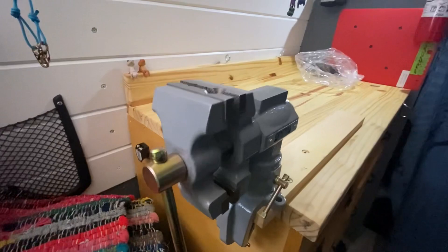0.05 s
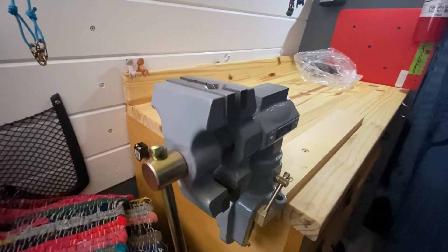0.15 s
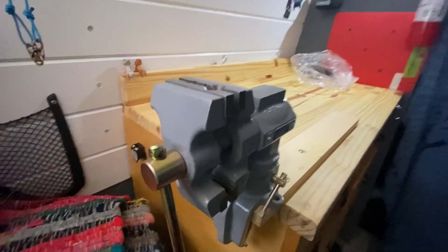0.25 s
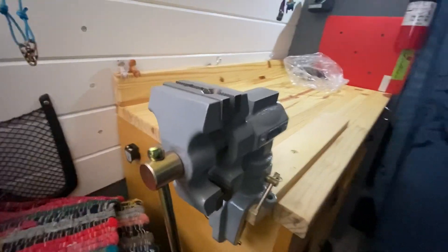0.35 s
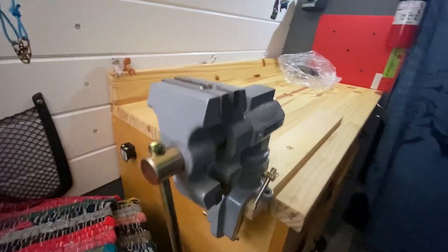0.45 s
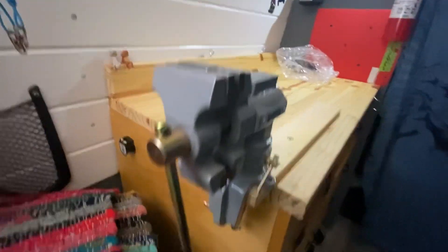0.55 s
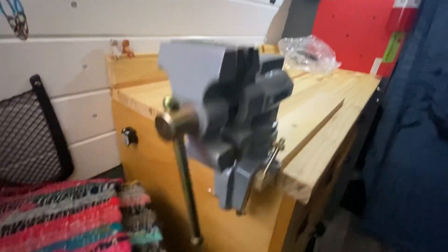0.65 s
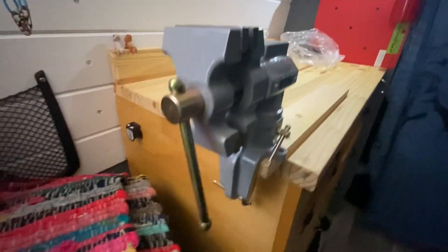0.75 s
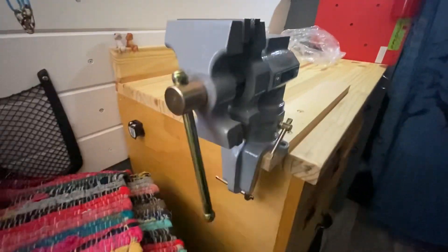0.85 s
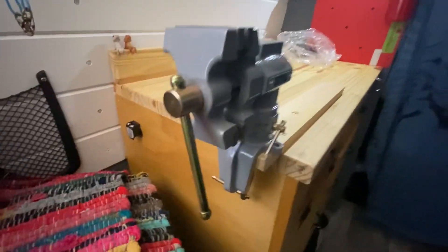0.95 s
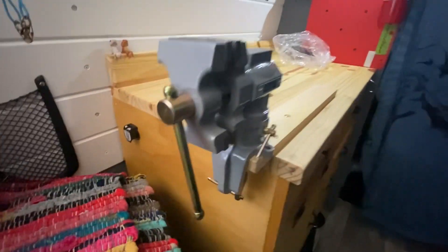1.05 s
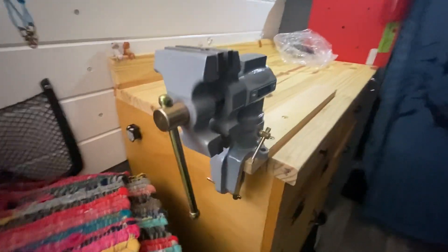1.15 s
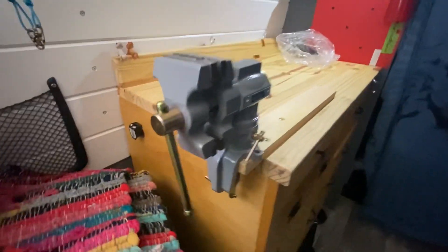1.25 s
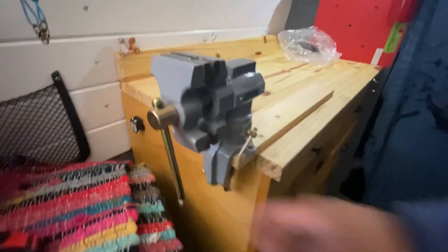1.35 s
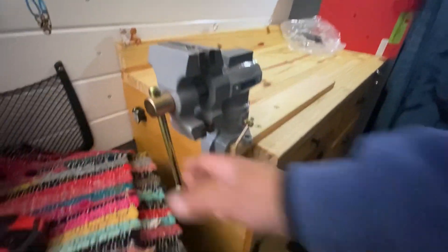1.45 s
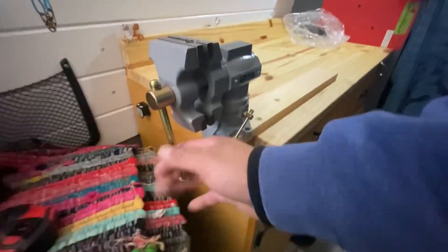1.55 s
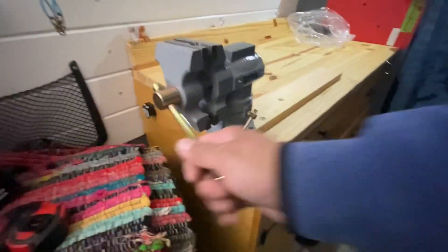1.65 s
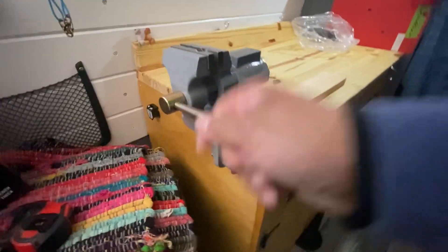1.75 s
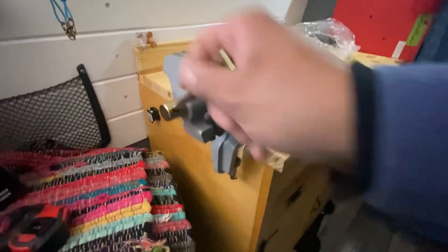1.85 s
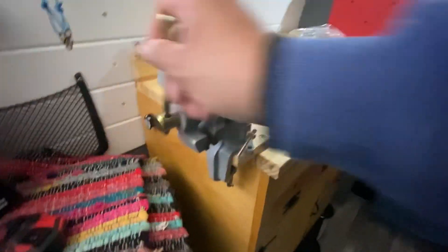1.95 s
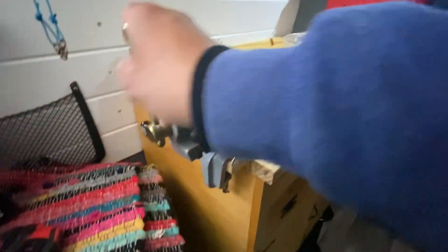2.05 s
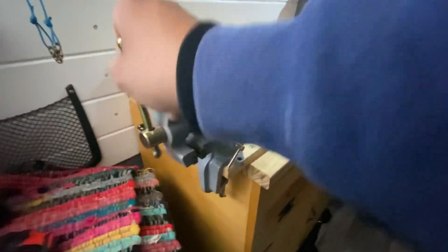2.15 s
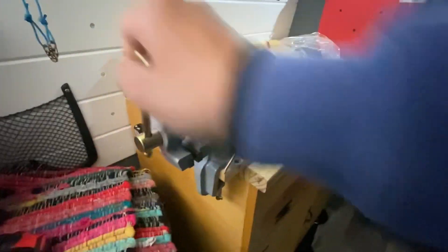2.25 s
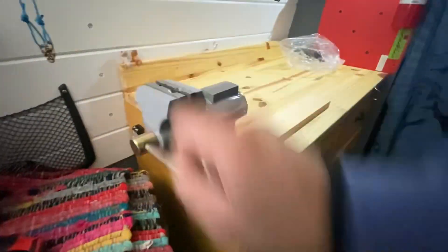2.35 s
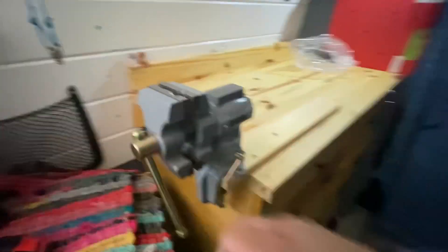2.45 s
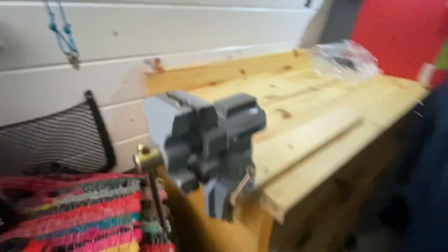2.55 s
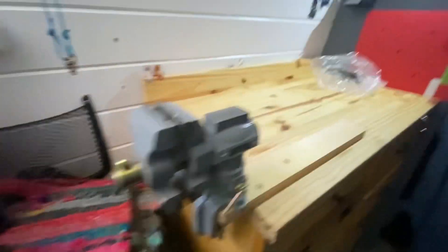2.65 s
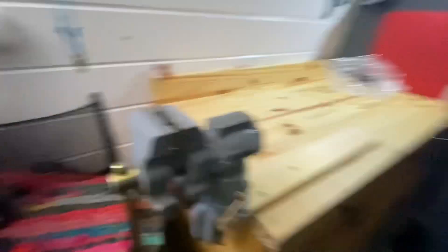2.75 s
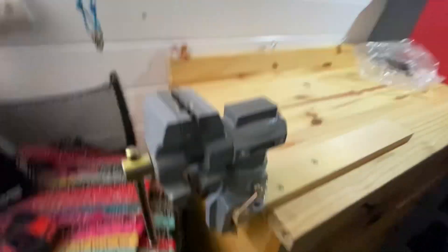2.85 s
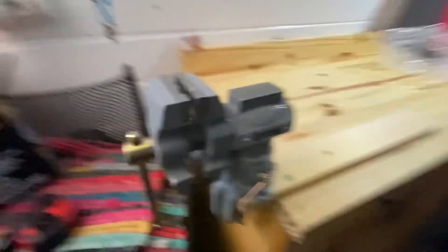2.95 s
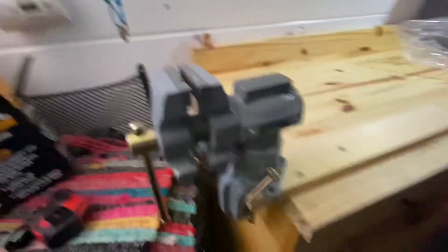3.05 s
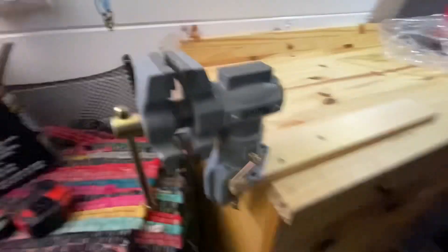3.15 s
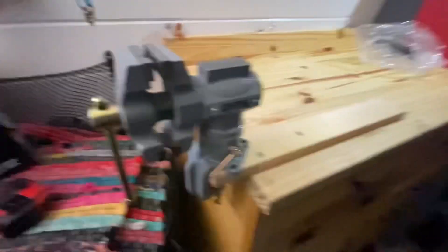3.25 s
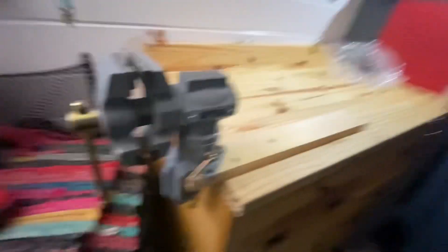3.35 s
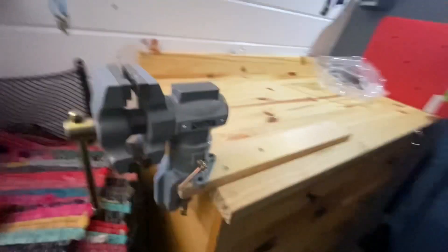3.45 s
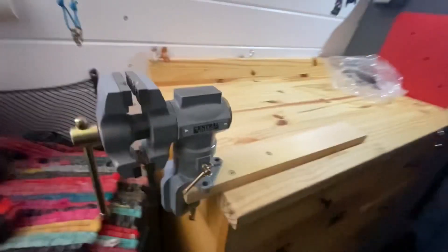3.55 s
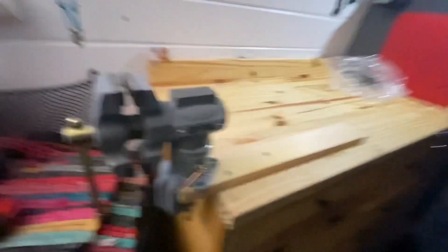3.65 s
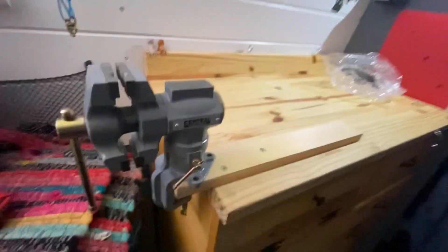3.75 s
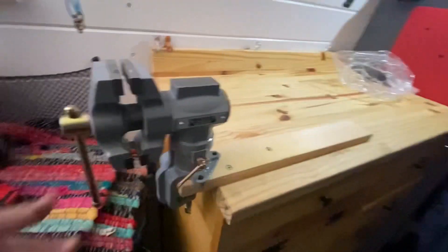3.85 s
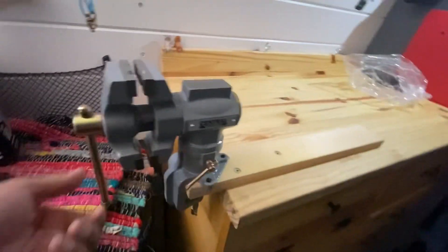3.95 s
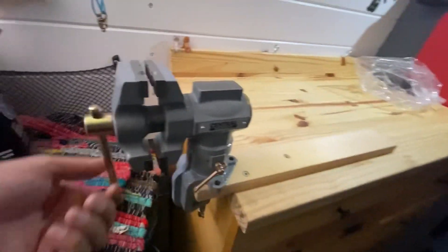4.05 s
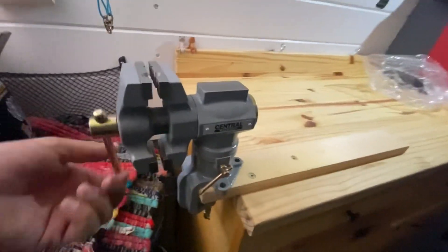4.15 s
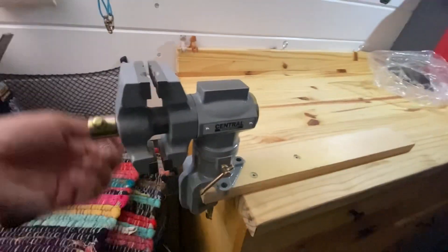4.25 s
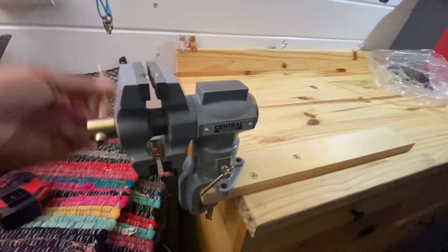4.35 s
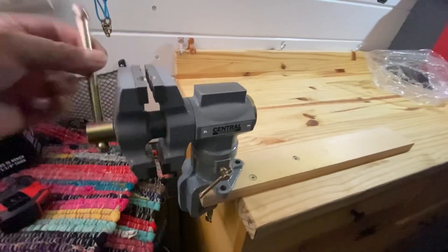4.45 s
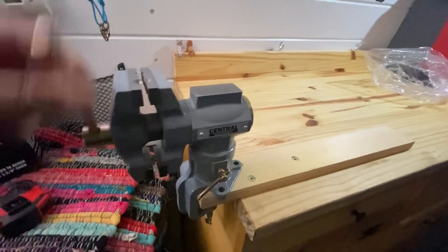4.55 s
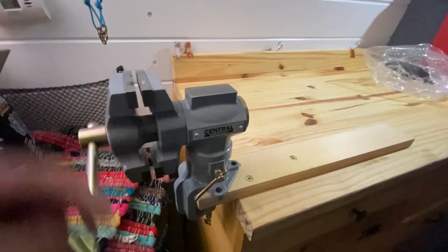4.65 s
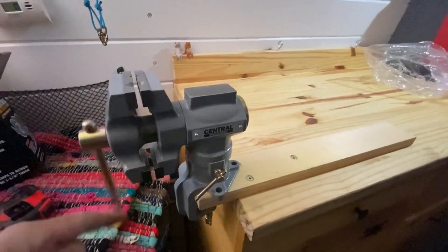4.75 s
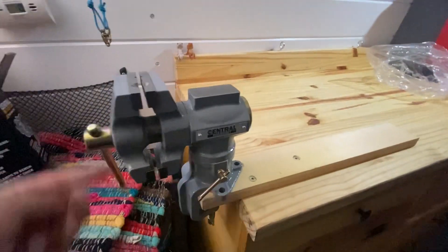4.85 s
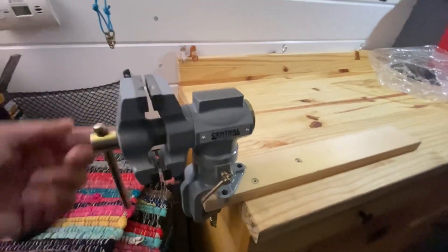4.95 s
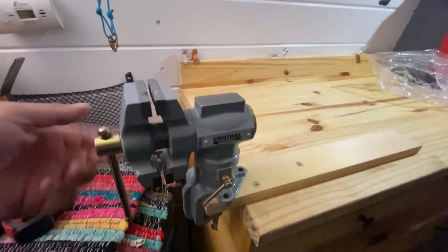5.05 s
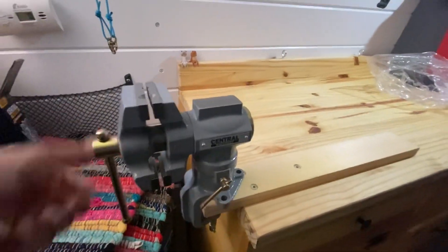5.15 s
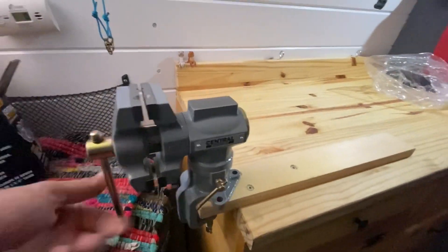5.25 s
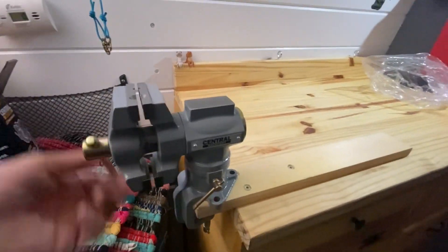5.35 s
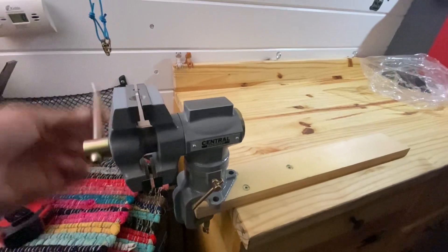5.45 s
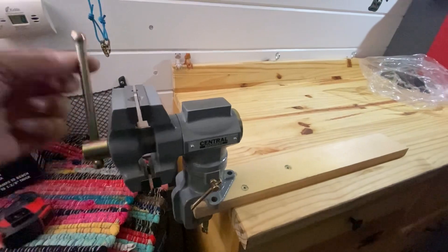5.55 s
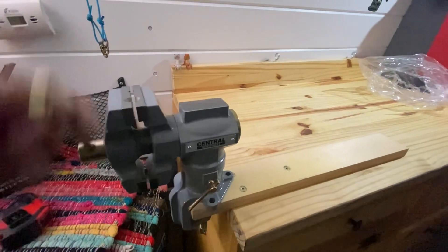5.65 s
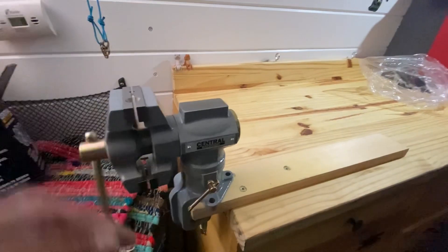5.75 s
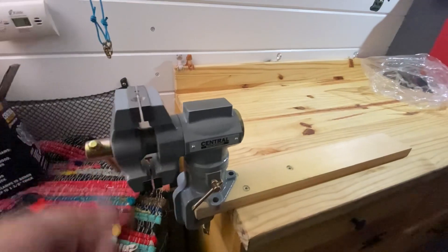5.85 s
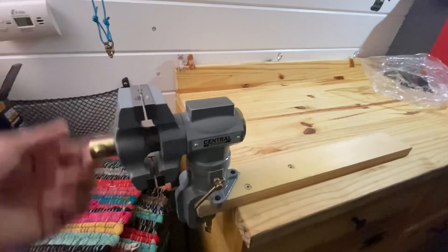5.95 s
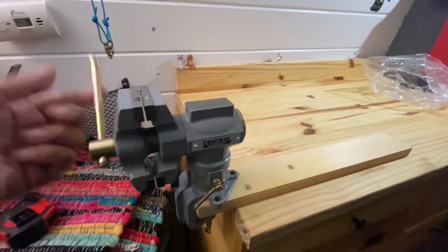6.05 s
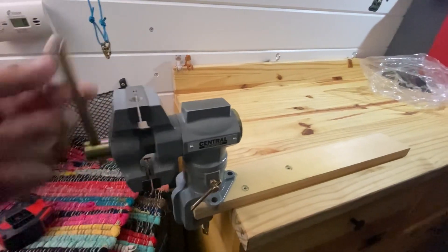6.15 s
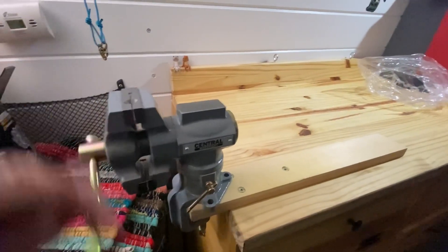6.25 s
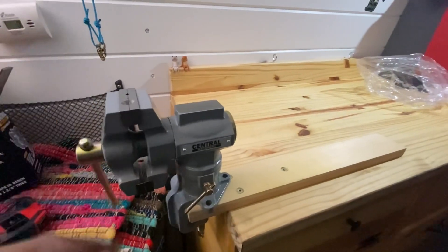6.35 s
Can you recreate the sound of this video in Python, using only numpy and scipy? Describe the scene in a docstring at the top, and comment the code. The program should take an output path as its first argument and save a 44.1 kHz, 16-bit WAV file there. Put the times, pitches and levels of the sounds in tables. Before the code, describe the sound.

A hand flips the handle of a bench vise in a small, dry cabin. Short metallic clacks and ringing clinks come in loose clusters, each with a rattle and dull wooden thud, and the turning screw gives brief rough groans. The loudest strike comes about a third of the way through. Low rumble wavers outside, strongest early, while clothing rustles near the stereo microphone; metal sits slightly left.

```python
"""In a small cabin, a hand swings and slides the steel handle of a bench vise clamped to a wooden bench.
The rod knocks in its hole: decaying sines ring, filtered noise cracks and rattles.
The bench thuds and groans as the screw turns: resonators are driven by the blows and by rough noise.
Ticks and faint reflections fill the cabin, cloth rustles near the microphone and a low rumble
swells and fades outside: all but the ticks are shaped noise."""
import sys
import numpy as np
from scipy import signal
from scipy.fft import rfft, irfft
from scipy.io import wavfile

SR = 44100
rng = np.random.default_rng(int(sys.argv[2]) if len(sys.argv) > 2 else 0)


def to_wav(s):
    """Save 16-bit WAV."""
    ch = np.atleast_2d(s).T  # columns
    pcm = np.round(np.clip(ch, -1, 1) * 32767)  # PCM
    wavfile.write(sys.argv[1], SR, pcm.astype(np.int16))


N = 281835


def from_db(db):
    """Decibel law: 20 dB is a factor of ten in amplitude."""
    return 10 ** (np.asarray(db) / 20)


def rms_one(x):
    """Normalisation to unit effective value."""
    return x / np.sqrt(np.mean(x ** 2) + 1e-20)


def in_time(rows):
    """Linear interpolation of each column over the seconds in the first."""
    seconds, *columns = np.transpose(rows)
    return [np.interp(np.arange(N) / SR, seconds, column) for column in columns]


def at_hz(points, hz):
    """Interpolation on a logarithmic frequency axis."""
    points_hz, values = np.array(points).T
    return np.interp(np.log(hz), np.log(points_hz), values)


def drift(rate_hz):
    """Low-pass random process: noise through two equal poles wanders slowly with spread 1."""
    pole = np.exp(-80 * np.pi * rate_hz / SR)  # one step every 40 samples
    noise = rng.standard_normal(N // 40 + 2002)
    slow = signal.lfilter([1], [1, -2 * pole, pole * pole], noise)[2000:]
    return np.interp(np.arange(N) / 40, np.arange(len(slow)), rms_one(slow))


def swells(s, db, rise_ms, fall_ms, order=1):
    """Superposed envelopes, as a level in dB; order 1 gives pointed peaks, 2 round ones."""
    t = np.arange(0, N, 32)[:, None] / SR - s
    away = np.where(t < 0, -1000 * t / rise_ms, 1000 * t / fall_ms)
    gain = from_db(db - 20 * away ** order).sum(axis=1)
    return np.interp(np.arange(N) / 32, np.arange(len(gain)), 20 * np.log10(gain + 1e-7))


def ring(force, hz, t60):
    """Damped resonator: a unit click sets a sine of initial height 1 ringing."""
    radius, angle = from_db(-60 / (t60 * SR)), 2 * np.pi * hz / SR
    feedback = [1, -2 * radius * np.cos(angle), radius * radius]
    return signal.lfilter([0, np.sin(angle)], feedback, force + 1e-18)


def band(x, low_hz, high_hz):
    """Band-pass filtering."""
    edges = [low_hz, min(high_hz, .45 * SR)]
    return signal.sosfilt(signal.butter(2, edges, "band", fs=SR, output="sos"), x)


def late(x, s):
    """Pure delay: a phase that grows in proportion to frequency."""
    return irfft(rfft(x) * np.exp(-2j * np.pi * np.fft.rfftfreq(N, 1 / SR) * s), N)


def add(track, s, piece):
    """Superposition of one event on a track."""
    at = int(s * SR)
    track[at:at + len(piece)] += piece[:N - at]


def contact(ms, grit):
    """Impact force: a short rough push of unit energy swells, peaks at half of ms and dies."""
    t = np.arange(len(grit)) / (SR * max(ms, .1) / 1000)
    push = grit * t * np.exp(-2 * t)
    return push / np.sqrt(np.sum(push ** 2))


CONTACT_MS, CRACK_DB, MODE_SPREAD_DB = 2.64, 19, 3
RATTLE_T60_S = 0.093
RATTLE_LUMP_DB = 5   # spread of the uneven touches, about 3 ms apart
GRIP_SHORTENS = 0.56   # dB on the ring time for each dB of the damping column
ROD_LAG_S = .0004   # delay of the left side
# Handle knocks. Each row: start in seconds, strength in dB of the vise's clank near 1.8 kHz, of the rod's
# main ring at 5.75 kHz, of the clink near 6.5 kHz and of the screw head's ring near 11 kHz, bench thud in dB,
# left over right in dB, rattle energy against the blow in dB, damping by the hand in dB (lower is firmer).
KNOCKS = [(1.5487, -41, -53, -36, -53, -49, 3, -4, -2.5), (1.5625, -32, -56, -54, -50, -53, -9.5, -22, -1),
          (2.1314, -41, -66, -54, -65, -55, -5, -0.5, -0.5),
          (2.1937, -28.5, -49, -43, -50, -48, -2.5, -5.5, -5),
          (2.3469, -19.5, -21.5, -15.5, -2.5, -35.5, -7.5, -16, -2),
          (2.3953, -52, -50, -44, -46.5, -57, -16.5, -1.5, -2.5),
          (2.412, -43, -70, -65, -70, -58, -11, -1, -5), (3.269, -37, -52, -53, -58, -57, -4.5, -16, -25),
          (4.0143, -48, -58, -44.5, -73, -63, -4, -1, -1),
          (4.0272, -37, -39.5, -37, -36, -53.5, -7.5, -17, -5),
          (4.5969, -38.5, -41.5, -41, -50, -50, -4.5, -10, 0.5),
          (4.667, -53, -74.5, -61, -58, -63, -7, -14.5, -4),
          (4.6967, -55.5, -73.5, -72, -78.5, -58, -6, -11.5, -5),
          (4.7274, -27, -55, -44, -78, -55.5, -2, -15, -9.5),
          (4.867, -56, -30, -35, -51, -54.5, -6.5, -3.5, -1),
          (4.8812, -39.5, -43, -37, -44.5, -56, -11.5, -3.5, -3),
          (5.2912, -40.5, -30, -41.5, -29, -47.5, -8, 2, 1),
          (5.64, -47, -53.5, -54, -68, -71.5, -10, -6.5, -2.5),
          (5.6599, -54, -44, -48, -61.5, -73, -9, -0.5, -18),
          (5.6967, -28, -35, -37, -40, -45.5, -8.5, -7.5, -3),
          (5.914, -35, -31, -22.5, -23, -45.5, -8, -5, -8),
          (5.9263, -34, -44, -44.5, -41, -54.5, -6, -11, -10),
          (5.954, -24.5, -59, -59, -54, -56, -6, -10, 4), (5.9722, -53, -64, -57, -67, -51, -20, -28, -0.5),
          (6.1148, -57, -69, -48, -82, -65, -4, -16.5, -7),
          (6.2137, -40, -61, -52, -60, -50, -11, -7.5, -16),
          (6.2701, -54, -79.5, -80.5, -74, -57.5, -5, -16.5, -8.5)]
# Frequencies in Hz where the four strengths of a knock apply.
STRENGTH_HZ = [1800, 5750, 6500, 11200]
# Modes of rod and screw head. Each row: frequency in Hz, relative level in dB, undamped t60 in seconds.
ROD_MODES = [(2005, -13, .024), (4470, -12, .017), (5720, 5, .044), (5800, -2, .03), (6300, 1, .021),
             (6650, 1, .03), (6910, -4, .024), (8330, -1, .024), (8580, 4, .028), (10770, -6, .014),
             (11160, 8, .026), (11480, 0, .021), (11780, -7, .021), (13150, 5, .024), (13870, 3, .024),
             (15200, -9, .014)]
# Colour common to all knocks. Each row: frequency in Hz, relative level in dB.
KNOCK_COLOUR = [(1800, 0.4), (4000, -2), (5750, -2.2), (6500, -1.5), (8500, -4), (11200, 1.5),
                (13500, -11.5)]
# The crack thins out where the rings take over. Each row: frequency in Hz, change in dB without a firm grip.
CRACK_FALL = [(4000, 2.1), (7000, -5.5), (11000, -26), (16000, -14)]


def rod_ring(t, colour, grip_db, own, phase):
    """Modal synthesis: the rod's ring is a sum of decaying sines, which the hand damps."""
    ring_out = 0
    for (hz, db, t60), chance, turn in zip(ROD_MODES, own, phase):
        held_t60 = t60 * from_db(GRIP_SHORTENS * grip_db)
        level_db = db + grip_db + at_hz(colour, hz) + MODE_SPREAD_DB * chance
        ring_out = ring_out + from_db(level_db - 60 * t / held_t60) * np.sin(2 * np.pi * (hz * t + turn))
    return ring_out


def handle():
    """Impact excitation: each knock rings the rod, cracks, rattles on in the hole and pushes the bench."""
    grit = rng.standard_normal((len(KNOCKS), 2, 8192))
    luck = rng.random((len(KNOCKS), 2, len(ROD_MODES)))
    t, hz = np.arange(8192) / SR, np.fft.rfftfreq(16384, 1 / SR) + 1
    left, right, thud = np.zeros((3, N))
    for row, (blow_grit, rattle_grit), (own, phase) in zip(KNOCKS, grit, luck):
        s, *strengths, thud_db, pan_db, rattle_db, grip_db = row
        strength_curve = list(zip(STRENGTH_HZ, strengths))
        colour = [(f, db + at_hz(strength_curve, f)) for f, db in KNOCK_COLOUR]

        lumps_db = RATTLE_LUMP_DB * np.repeat(blow_grit[-64:], 128)
        rattle = rattle_grit * from_db(lumps_db - 60 * t / RATTLE_T60_S) * np.clip(t / 0.0057, 0, 1)
        rattle = from_db(rattle_db) * rattle / np.sqrt(np.sum(rattle ** 2))
        force = contact(CONTACT_MS, blow_grit) + rattle

        modes = rod_ring(t, colour, grip_db, own, phase)
        thinning_db = at_hz(CRACK_FALL, hz) * min(from_db(grip_db), 1)
        crack = from_db(at_hz(colour, hz) + thinning_db + CRACK_DB)
        crack = crack * np.exp(-2j * np.pi * hz * 0.0019)   # 1.9 ms late
        crack = crack * hz ** 2 / (hz ** 2 + 1100.0 ** 2)   # less bass
        sound = irfft(rfft(force, 16384) * crack + rfft(rattle, 16384) * rfft(modes, 16384))
        # the ring builds up while the contact lasts
        sound[:len(t)] += modes * (1 - np.exp(-(1000 * t / CONTACT_MS) ** 2))

        add(left, s, sound * from_db(pan_db / 2))
        add(right, s, sound * from_db(-pan_db / 2))
        add(thud, s + 0.0055, force * from_db(thud_db))   # the wood answers a moment later
    return np.array([late(left, ROD_LAG_S), right]), thud


AFTER_SWELL_MS, AFTER_FADE_MS = 50, 350   # for 20 dB
UPPER_AFTER_DB = -66
# The hanging rod rings on faintly. Each row: peak time in seconds, level of the lower mode in dB.
AFTER = [(6.0, -61), (6.34, -66)]


def after_ring():
    """Sustained resonance: noise keeps two low rod modes wavering while the rod swings in its hole."""
    lower = from_db(swells(*np.transpose(AFTER), AFTER_SWELL_MS, AFTER_FADE_MS))
    shake = rng.standard_normal(N)
    # the upper mode sounds once and dies first
    upper = from_db(swells(AFTER[0][0], UPPER_AFTER_DB, AFTER_SWELL_MS, AFTER_FADE_MS / 2))
    return lower * rms_one(ring(shake, 2070, .12)) + upper * rms_one(ring(shake, 3350, .045))


BENCH_LAG_S, BENCH_LEFT_DB = .00022, -3.5   # delay and level of the left side
# Modes of the wooden bench. Each row: frequency in Hz, relative level in dB, longest t60 in seconds.
BENCH_MODES = [(84.2, -2.5, 0.14), (109, -6.5, 0.3), (192.9, -42.5, 0.11), (239.5, -3.5, .13),
               (290.3, -3, 0.082), (380, -13.5, 0.1), (491.4, -26.5, 0.12), (580.5, -14, 0.06),
               (755, 8.5, 0.068), (877, 2, 0.045), (1041, 5, .03), (1342, 16, 0.0085), (1560, 0.5, 0.018),
               (2286, -31, 0.0033)]
# The turning screw shakes the bench, push by push. Each row: peak time in seconds, peak level in dB,
# ms to swell by 20 dB, ms to fade by 20 dB.
GROAN = [(1.563, -38, 20, 133), (1.75, -61.5, 114, 122), (2.156, -44, 40, 78), (2.209, -35, 49.5, 69),
         (2.366, -28.5, 30, 98.5), (3.281, -48.5, 40, 25), (3.346, -61, 20.5, 150), (4.04, -52, 38, 57),
         (4.274, -52.5, 111, 502.5), (4.507, -45.5, 24, 101.5), (4.58, -56.5, 39.5, 50),
         (4.621, -40, 39.5, 63), (4.699, -43, 30.5, 111), (4.736, -51, 82, 63), (4.882, -47, 13, 60),
         (5.32, -43.5, 25.5, 401), (5.593, -48, 121, 56), (5.714, -40.5, 43, 149.5),
         (5.774, -42, 122, 85.5), (5.924, -33.5, 4.5, 106.5), (6.27, -43.5, 150, 86.5)]


def bench(thud):
    """Forced vibration: thuds and the slow rough shaking of the screw ring the same wooden modes."""
    level = from_db(swells(*np.transpose(GROAN)))
    shake = band(rng.standard_normal(N), 200, 370)
    shake = shake * from_db(3.38 * drift(23))
    # wood damps a ring within 30 cycles
    modes = [(hz, db, min(t60, 30 / hz)) for hz, db, t60 in BENCH_MODES]
    groan = rms_one(sum(from_db(db) * ring(shake, hz, t60) for hz, db, t60 in modes))
    thud = band(thud, 49, 6100)
    return level * groan + sum(from_db(db) * ring(thud, hz, t60) for hz, db, t60 in modes)


DENSE_DB, DENSE_T60_S = -10.52, 0.16


def dense_body(thud):
    """High modal density: the close upper modes of bench and cast iron merge into a grainy tail."""
    t = np.arange(SR // 4) / SR
    tail = band(rng.standard_normal(len(t)), 430, 2100)
    tail = tail * from_db(-60 * t / DENSE_T60_S) * np.clip(t / 0.0027, 0, 1)
    return from_db(DENSE_DB) * signal.fftconvolve(thud, rms_one(tail))[:N]


# Small ticks in the cabin. Each row: start in seconds, peak level in dB, centre of the band in Hz.
TICKS = [(0.1204, -41, 1780), (2.503, -37.5, 2530), (2.538, -41, 1800), (2.663, -37.5, 1880),
         (2.7747, -43, 8340), (2.8613, -37.5, 2170), (3.289, -46, 8940), (3.697, -45.5, 3000),
         (5.5866, -41.5, 1785), (5.805, -53.5, 1200), (4.503, -50, 984), (3.616, -51.5, 3970)]


def ticks():
    """Broadband transients: dry clicks, each in a broad band round its centre."""
    out, grit = np.zeros(N), rng.standard_normal((len(TICKS), 600))
    for (s, db, hz), g in zip(TICKS, grit):
        click = band(contact(.12, 1 + .7 * g), hz * .3, hz * 1.8)
        add(out, s, from_db(db) * click / np.max(np.abs(click)))
    return out


CABIN_DB = -10.5
# Reverberation of the cabin. Each row: frequency in Hz, t60 in seconds.
CABIN_T60 = [(200, 0.12), (1000, 0.12), (4000, 0.1464), (9000, 0.02), (15000, .1)]


def cabin(x):
    """Diffuse reverberation: noise that dies band by band, unrelated in the two ears."""
    t, edges = np.arange(SR // 3) / SR, 100 * 2. ** np.arange(0, 8)
    white = rng.standard_normal((2, len(t)))
    tail = 0
    for low, high in zip(edges, edges[1:]):
        tail = tail + band(white, low, high) * from_db(-60 * t / at_hz(CABIN_T60, low * np.sqrt(2)))
    tail = tail * np.clip(t / 0.006, 0, 1)
    return signal.fftconvolve(x[None], tail / np.sqrt(np.sum(tail[0] ** 2)), axes=1)[:, :N]


SCRAPE_DB = -24   # finer rubbing noise, relative to the groan
HISS_TAIL_DB, HISS_TAIL_MS = -33, 110   # after each knock: relative to the rod's main ring, fade by 20 dB
# Steady background. Each row: time in seconds, cabin air in dB, hiss in dB, steady cloth in dB.
AROUND = [(0.0, -60.5, -78.5, -76.5), (0.6, -62.5, -84.5, -81), (1.0, -60, -82.5, -80),
          (1.56, -58, -70, -80), (2.1, -58.5, -85.5, -72.5), (2.53, -59.5, -75, -74),
          (2.95, -62.5, -77.5, -83), (3.1, -67, -80.5, -92.5), (3.17, -67, -85, -105),
          (3.55, -70.5, -79.5, -105), (3.75, -68, -76.5, -100), (4.4, -72, -81.5, -105),
          (4.8, -72.5, -78, -105), (5.2, -75.5, -84, -105), (5.6, -69, -80.5, -97.5),
          (5.88, -69.5, -79, -98), (6.39, -65, -79.5, -94)]
# Cloth rustles. Each row: peak time in seconds, level in dB before flutter, ms to swell or fade by 20 dB.
RUSTLE = [(.955, -69.5, 48), (1.39, -71, 192), (1.719, -70, 70), (1.9, -73, 68), (2.2, -79, 36),
          (2.55, -76, 148), (2.66, -72, 90.5), (2.78, -70.5, 98.5), (2.969, -68, 63.5), (3.085, -73, 65.5),
          (3.24, -73.5, 73.5), (3.274, -59.5, 20), (3.43, -66, 72), (3.656, -68, 67.5), (3.73, -83, 120.5),
          (4.1, -81, 67.5), (4.285, -70.5, 60), (4.38, -91, 100), (4.67, -70, 66), (5.195, -75.5, 62),
          (5.47, -89.5, 96.5), (5.65, -81.5, 54), (5.776, -75.5, 43.5), (5.89, -74.5, 42),
          (6.07, -83.5, 50), (6.24, -78, 89.5)]
# Outside rumble in three wavering bands. Each row: time in seconds, level in dB near 46, 67 and 100 Hz.
THROB = [(0.0, -56, -55.5, -65.5), (0.48, -63.5, -58.5, -52), (0.75, -63, -48.5, -53),
         (0.999, -74, -47, -57.5), (1.551, -59, -48, -51), (1.94, -57.5, -54.5, -53.5),
         (2.4, -52.5, -49, -48), (2.8, -52.5, -63.5, -53.5), (3.38, -60.5, -66.5, -60.5),
         (3.65, -56, -66, -64.5), (3.95, -55, -64.5, -66), (4.3, -62, -70, -58), (4.7, -59, -63.5, -63.5),
         (5.1, -76, -68.5, -73), (5.36, -75.5, -69, -76), (5.55, -61, -60.5, -58.5), (5.94, -62, -69, -57),
         (6.39, -70, -58, -63)]
# Spectral shapes of the three rumble bands. Each row: frequency in Hz, relative density in dB per Hz.
DEEP = [(22, -28.5), (34, -15.5), (46, 26.5), (56, -11.5), (70, -50.5)]
MIDDLE = [(45, -29), (58, 14.5), (67, 15), (80, 6), (95, -57)]
UPPER = [(70, -36.5), (86, 11), (100, 10.5), (135, 1), (185, -13), (300, -57)]
# Spectral shapes of cabin air, hiss, cloth and rubbing. Each row: frequency in Hz, relative dB per Hz.
AIR = [(100, -24.5), (160, 0.5), (300, -1.5), (600, -4.5), (1000, -5.5), (1500, -13), (2300, -17),
       (3500, -21), (5500, -23.5), (8000, -42.5)]
HISS = [(1500, -23.5), (2500, -26), (4000, -19), (5500, -8), (7500, -1), (8600, 1.5), (10200, -21.5),
        (12000, -24), (16000, -27.5)]
CLOTH = [(2500, -15), (4000, -15.5), (6500, -11), (8500, -5.5), (11000, -16.5), (14000, -7.5),
         (16000, -1.5)]
SCRAPE = [(200, -12.5), (400, -2.5), (750, 2.7), (1100, 5.5), (1600, -6.5), (2500, -20.5), (4500, -17),
          (8000, -32)]
# Left-right likeness of the background. Each row: frequency in Hz, correlation from -1 to 1.
LIKENESS = [(40, 0.93), (100, 0.96), (170, 0.5), (380, 0.27), (950, 0.1977), (2380, 0.45), (5980, 0.2),
            (15000, 0.5)]


def background():
    """Power addition: in each third-octave of stereo noise the powers of all layers add."""
    layers = list(zip([DEEP, MIDDLE, UPPER], in_time(THROB)))
    layers += list(zip([AIR, HISS, CLOTH], in_time(AROUND)))
    rustle_s, rustle_db, length_ms = np.transpose(RUSTLE)
    knock_s, _, ring_db = np.transpose(KNOCKS)[:3]
    layers.append((SCRAPE, swells(*np.transpose(GROAN)) + SCRAPE_DB))
    layers.append((HISS, swells(knock_s, ring_db + HISS_TAIL_DB, 2.4, HISS_TAIL_MS)))
    rustle = swells(rustle_s, rustle_db, length_ms, length_ms, order=2)
    layers.append((CLOTH, rustle + 2.8 * drift(32)))

    edges = 8000 * 2 ** (np.arange(-26, 4) / 3)
    centres, widths = np.sqrt(edges[1:] * edges[:-1]), np.diff(edges)
    shares = [from_db(2 * at_hz(shape, centres)) * widths for shape, _ in layers]
    powers = [from_db(2 * db) / np.sum(share) for share, (_, db) in zip(shares, layers)]
    out, white = 0, rng.standard_normal((2, 2, N))
    for k, hz in enumerate(centres):
        # neighbouring bands use different noise
        mid, side = band(white[k % 2], edges[k], edges[k + 1]) / np.sqrt(4 * widths[k] / SR)
        alike = np.clip(at_hz(LIKENESS, hz), -1, 1)
        power = sum(share[k] * layer_power for share, layer_power in zip(shares, powers))
        gain = np.sqrt(power) * from_db(0.6 * drift(5.3))
        out = out + gain * (np.sqrt(1 + alike) * mid + np.sqrt(1 - alike) * side * [[1], [-1]])
    return out


def scene():
    """Superposition of rod, bench, reflections and background."""
    rod, thud = handle()
    wood = bench(thud) + dense_body(thud) + ticks() + after_ring()
    # the vise is nearer the right side
    wood_pair = np.array([from_db(BENCH_LEFT_DB) * late(wood, BENCH_LAG_S), wood])
    reflections = from_db(CABIN_DB) * cabin(rod.mean(axis=0) + wood)
    return rod + wood_pair + reflections + background()


NARROW_HZ, CUTOFF_HZ = 9200, 16600   # stereo width ends, stopband of the top cut begins


def record(dry):
    """Mid-side filtering: the high treble sits in the centre; the deepest bass and the top are cut."""
    dry = signal.sosfilt(signal.butter(2, 32, "high", fs=SR, output="sos"), dry)
    mid, side = (dry[0] + dry[1]) / 2, (dry[0] - dry[1]) / 2
    side = signal.sosfiltfilt(signal.butter(4, NARROW_HZ, fs=SR, output="sos"), side)
    top_cut = signal.cheby2(12, 70, CUTOFF_HZ, fs=SR, output="sos")
    return signal.sosfilt(top_cut, [mid + side, mid - side])


dry = scene()
out = record(dry)
to_wav(out)
```